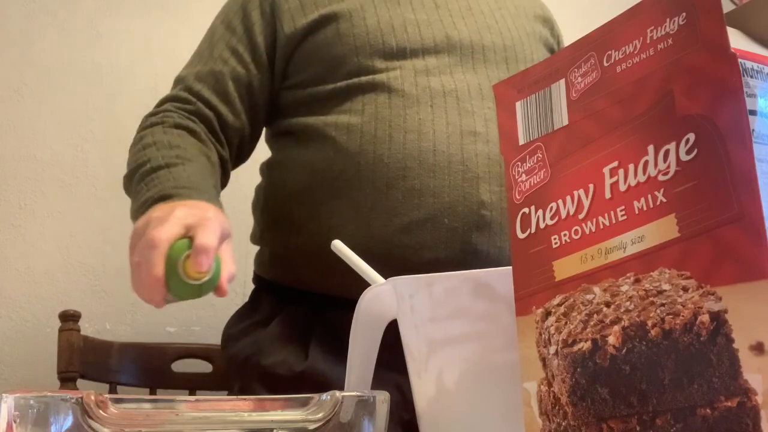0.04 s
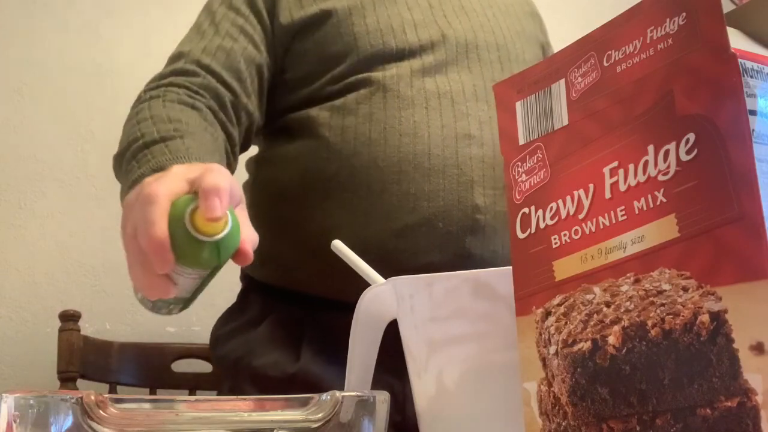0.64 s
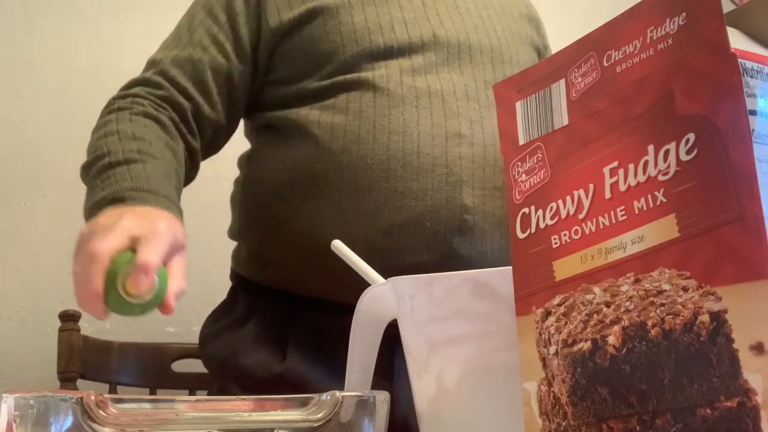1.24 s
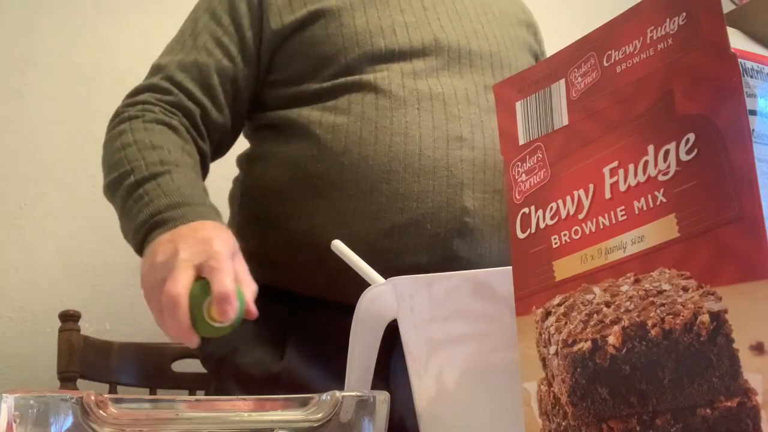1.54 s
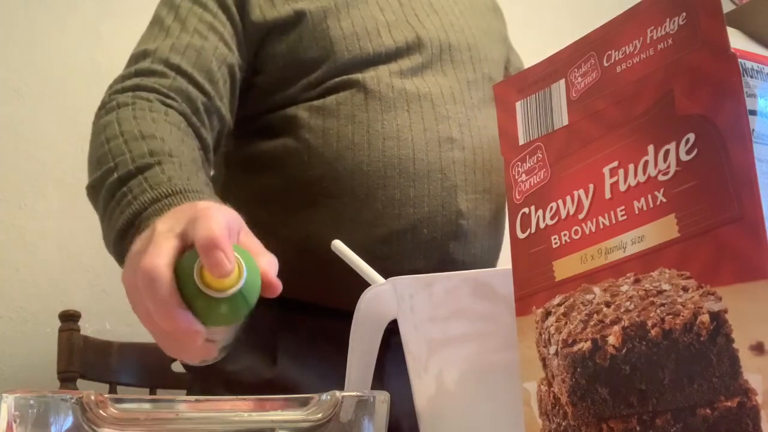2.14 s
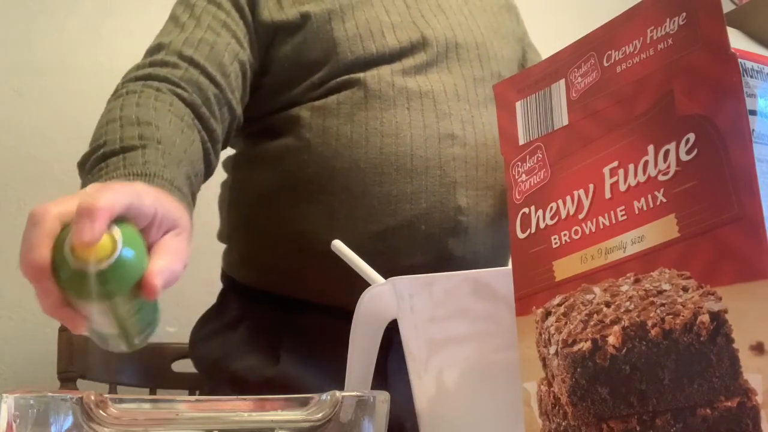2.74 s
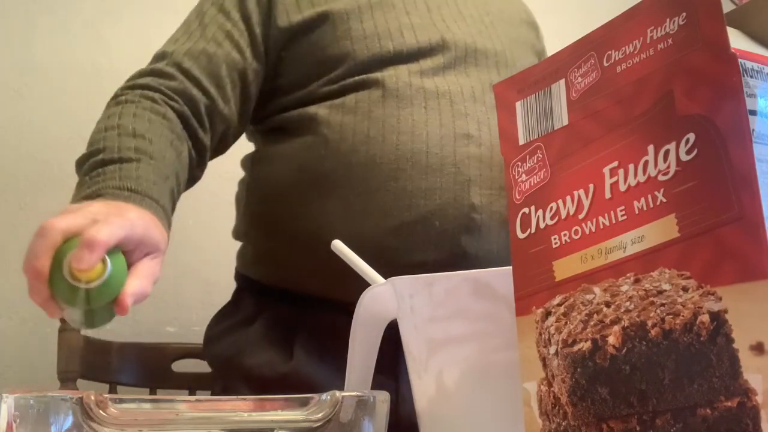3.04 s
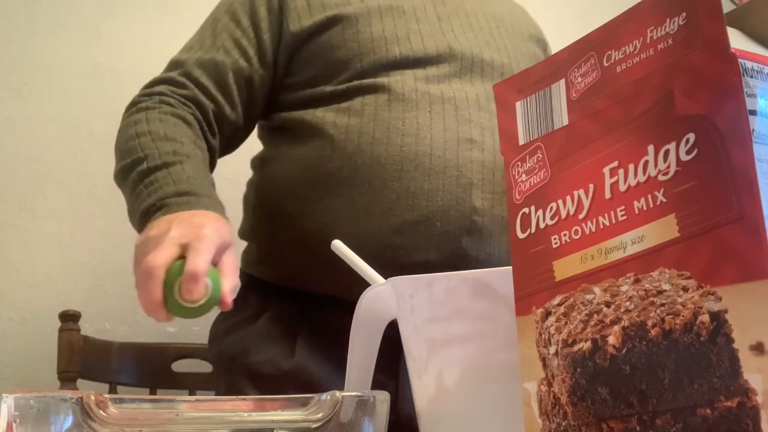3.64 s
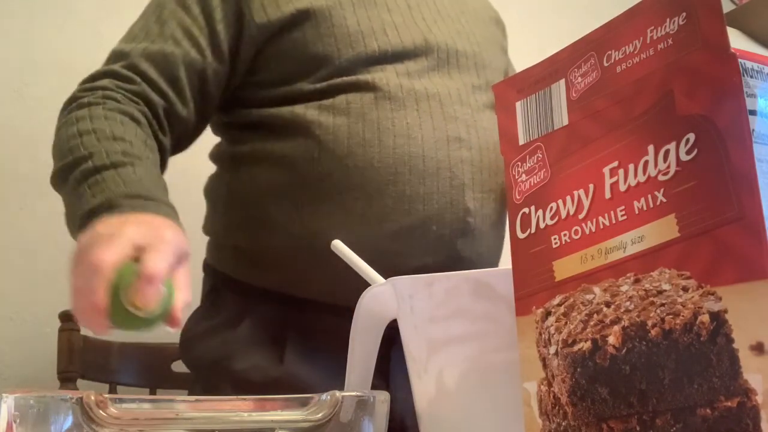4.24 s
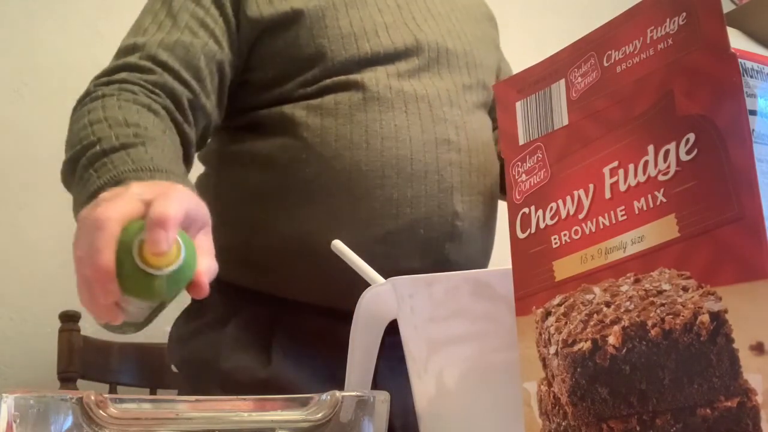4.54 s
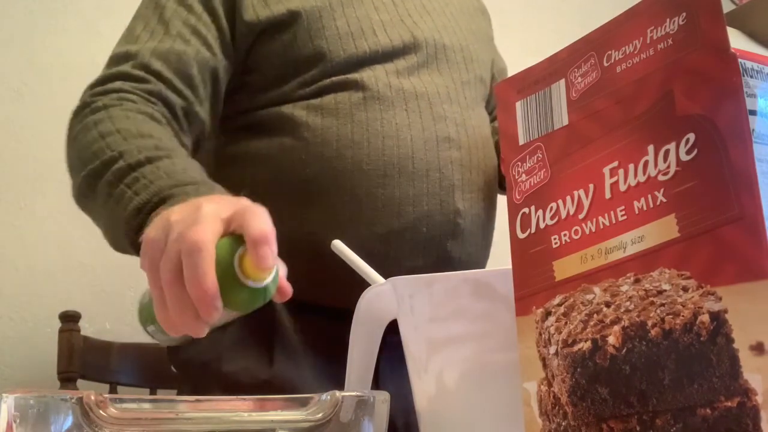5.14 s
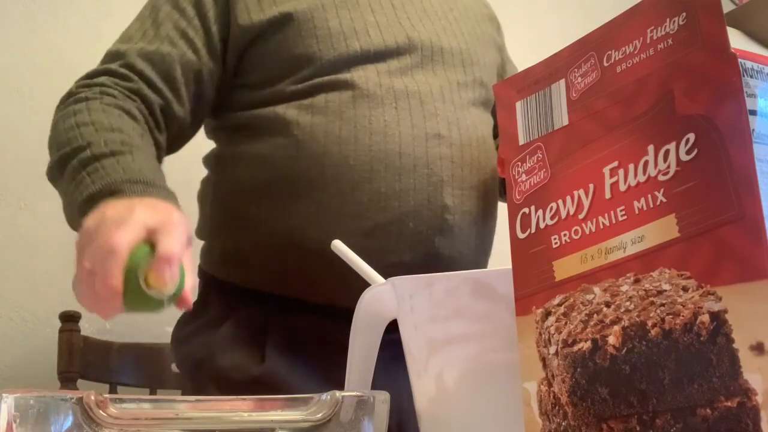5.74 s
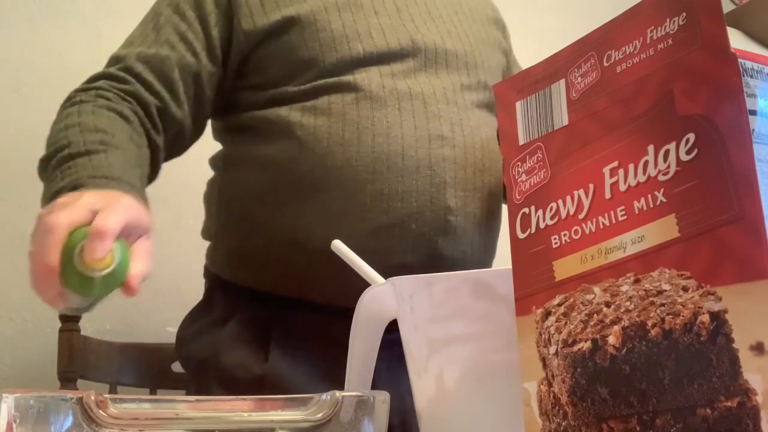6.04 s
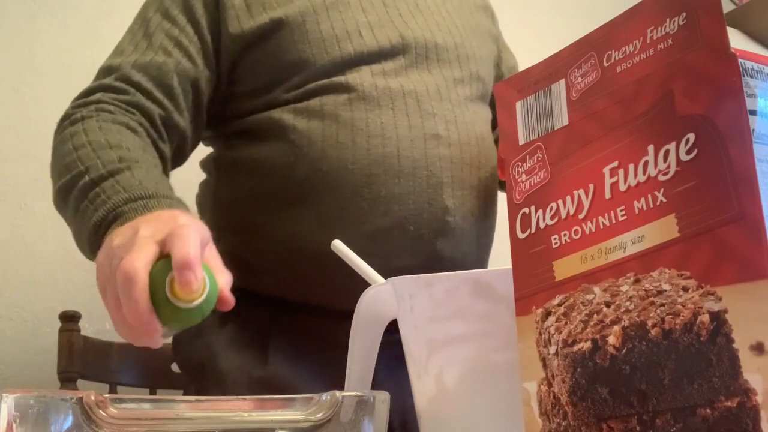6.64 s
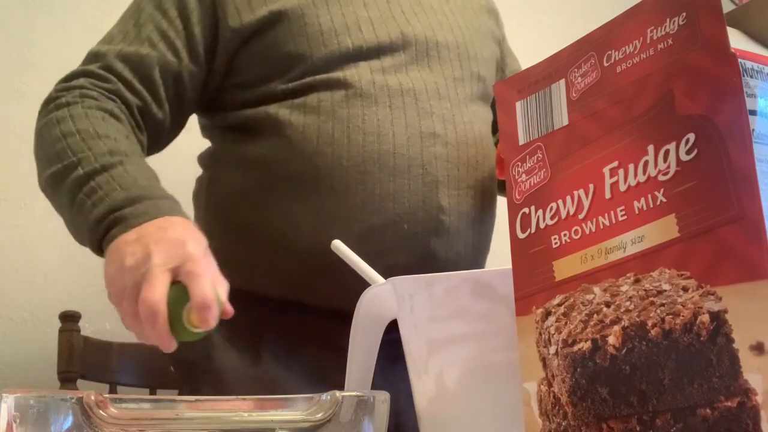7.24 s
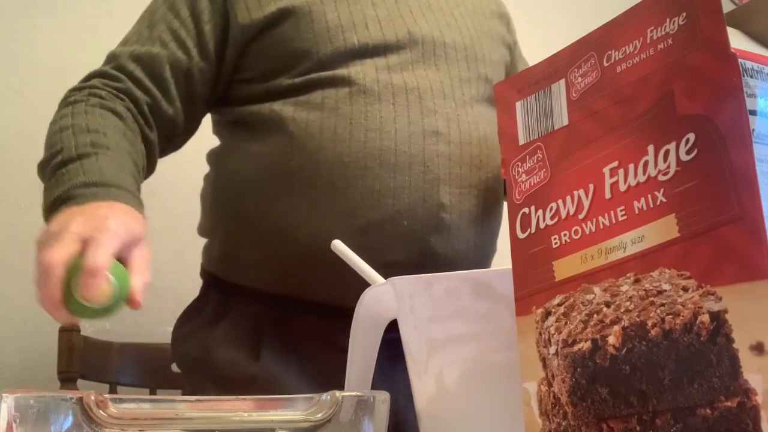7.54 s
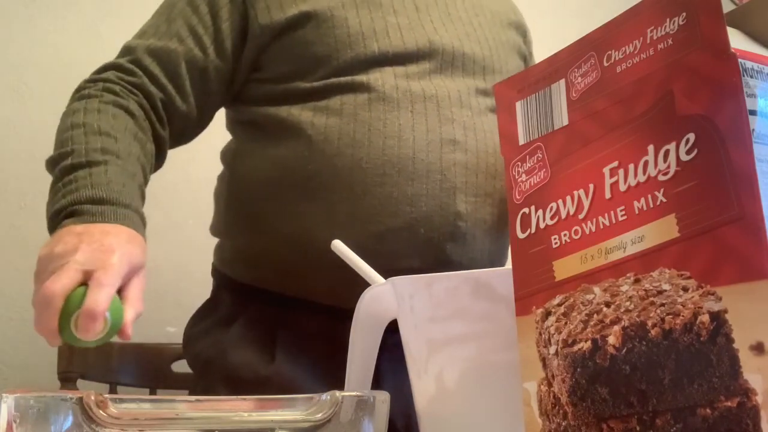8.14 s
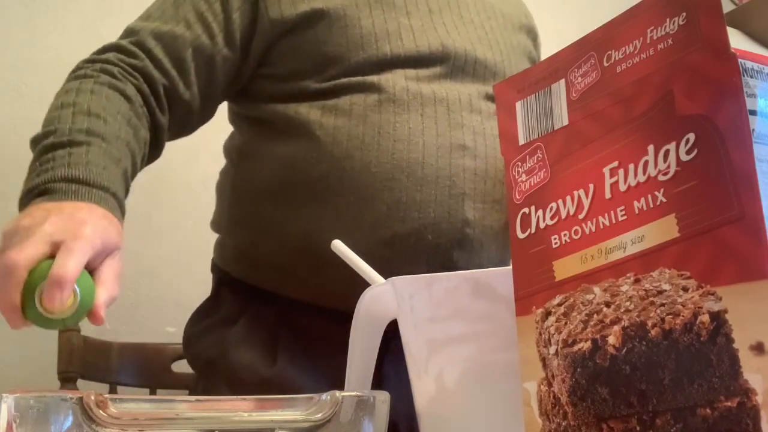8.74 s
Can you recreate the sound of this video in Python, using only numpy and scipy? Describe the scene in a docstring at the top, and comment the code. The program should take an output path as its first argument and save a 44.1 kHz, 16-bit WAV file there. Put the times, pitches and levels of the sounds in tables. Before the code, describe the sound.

An aerosol can of cooking spray hisses over a glass dish in three long presses, then three short spitting spurts, in a quiet kitchen.

```python
"""A can of cooking spray is swept over a glass baking dish on a table in a quiet kitchen.
First come a light knock and three long presses of about two seconds each: the oily jet sputters, the mist
drums on the glass, and the echo off the moving spray's target swirls the hiss, over a few soft bumps.
From 6.6 s three short spurts follow, each spitting as the valve opens; the second catches and restarts.
At last the plastic button springs back, and a sleeve that has brushed now and then rustles once more."""
import sys
import numpy as np
from scipy import signal
from scipy.fft import rfft, irfft
from scipy.io import wavfile

SR = 44100
rng = np.random.default_rng(int(sys.argv[2]) if len(sys.argv) > 2 else 0)


def store_pcm(level_fs):
    """Save levels as 16-bit WAV."""
    pcm = np.round(np.clip(level_fs, -1, 1) * 32767).astype(np.int16)
    wavfile.write(sys.argv[1], SR, np.atleast_2d(pcm).T)


N = 392490
TIME, HZ = np.arange(N) / SR, np.fft.rfftfreq(N, 1 / SR)


# The tone of the hiss, before each part gets its own loudness: f/Hz, relative level/dB
HISS_TONE = [(100, -16.5), (230, -24), (350, -19), (560, -20), (820, -16), (1150, -21), (1700, -17.5),
             (2600, -16), (4900, -10), (6500, -13), (8200, -8.5), (10500, -2.5), (12400, -0.5),
             (13700, -1.5), (15500, 3)]
# Its five parts (jet, mist, splash, drumming, rush of gas):
# low f/Hz, high f/Hz, added level/dB, sputter depth/dB, exponent (higher fades sooner with the flow)
HISS_PARTS = [(8920, 18600, 4.8, 1.55, 1.7), (5900, 8300, 2.5, 1.5, 1.6), (1570, 5550, -0.65, 1.05, 0.84),
              (702, 1486, 0.24, 0.5, 0.74), (166.3, 690, -3, 2.5, 0.48)]
def spray(sputter_hz=420, surge_hz=45, surge=0.31, extra_per_db=0.028, waver_hz=9, waver_db=0.48):
    """Churning gas hisses; oil and gas leave in clumps, so all parts of the hiss sputter together."""
    levels_db = spray_levels()
    jet_db = levels_db[0]
    force = np.clip(1 + extra_per_db * (jet_db - jet_db.mean()), .5, 2)  # a strong jet sputters more
    sputter = force * unit(flutter(sputter_hz) + surge * flutter(surge_hz))
    flow = valve() * amp(waver_db * flutter(waver_hz))  # the finger is never quite steady
    tone, out = amp(across(HISS_TONE)), np.zeros(N)
    for level_db, (low_hz, high_hz, trim_db, depth_db, power) in zip(levels_db, HISS_PARTS):
        hiss = mono_noise(band(low_hz, high_hz, steepness=10) * tone)
        out += hiss * amp(level_db + trim_db) * unit(amp(depth_db * sputter)) * flow ** power
    return out


# Long presses of the button: open t/s, shut t/s, fade t/s
LONG_PRESSES = [(0.002, 2.38, .042), (2.441, 4.412, .05), (4.4865, 6.487, .021)]
# Short spurts; the second restarts, so it takes two rows:
# open t/s, shut t/s, jet level/dB, splash level/dB, drumming level/dB, drop of the jet/(dB per s)
SHORT_SPURTS = [(6.587, 6.808, -39, -48.5, -61.5, -2), (6.9404, 6.987, -42, -48.5, -62.5, 32),
                (7.005, 7.355, -37.5, -46.5, -61.5, 16), (8.043, 8.292, -42.5, -51.5, -63.5, 11)]
def valve(opening_s=0.0025, spurt_fade_s=0.018):
    """The flow, from 0 to 1: it starts almost at once and dies away when the finger lifts."""
    pushes = list(LONG_PRESSES) + [(start, shut, spurt_fade_s) for start, shut, *_ in SHORT_SPURTS]
    flow = np.zeros(N)
    for start, shut, fade_s in pushes:
        opening = np.clip((TIME - start) / opening_s, 0, 1)
        closing = np.exp(-np.maximum(TIME - shut, 0) / fade_s)
        flow = np.maximum(flow, opening * closing)
    return flow


# Loudness as the can tilts and the aim wanders, one list for each long press:
# t/s, jet level/dB, splash level/dB, drumming level/dB
PRESS_LEVELS = [
    [(0.08, -42, -54.5, -77), (0.33, -42, -60, -76), (0.37, -41.5, -53.5, -69), (0.58, -36.5, -52.5, -69),
     (1.05, -38, -49.5, -70), (1.23, -44.5, -52.5, -68.5), (1.62, -46.5, -52.5, -71),
     (1.81, -45.5, -49, -65.5), (1.86, -41, -48, -67), (2.25, -38.5, -49, -64.5),
     (2.37, -36.5, -48.5, -63.5)],
    [(2.47, -31, -47, -58.5), (2.49, -29, -45.5, -58.5), (2.668, -30, -44.5, -58),
     (2.866, -33.5, -47, -58.5), (3.076, -37.5, -46.5, -58.5), (3.496, -42.5, -52.5, -63),
     (3.9, -44, -50, -67.5), (3.958, -38.5, -49.5, -64.5), (4.146, -42.5, -50.5, -70.5),
     (4.238, -47.5, -52, -63.5), (4.4, -46, -50, -66)],
    [(4.51, -36, -47, -60.5), (4.612, -34.5, -45.5, -60.5), (4.722, -32, -44.5, -57.5),
     (4.984, -32, -44.5, -58), (5.274, -37.5, -47, -61), (5.508, -38, -47, -59.5), (5.824, -36, -48, -59.5),
     (5.884, -41, -48.5, -60), (6.016, -37, -46.5, -60.5), (6.246, -43, -50.5, -61),
     (6.47, -38, -46.5, -61.5)],
]
def spray_levels(splash_share=.6, mist_swell=0.7, rush_swell=1.4):
    """The five parts' levels in dB follow the aim; in most spurts they sink as the pressure sags."""
    rows = [row for press in PRESS_LEVELS for row in press]
    for start, shut, jet, splash, drum, sag in SHORT_SPURTS:
        lost_db = sag * (shut - start)
        rows += [(start, jet, splash, drum), (shut, jet - lost_db, splash - splash_share * lost_db, drum)]
    times, *columns = np.transpose(rows)
    jet, splash, drum = [np.interp(TIME, times, column) for column in columns]
    mist = splash.mean() + mist_swell * (splash - splash.mean())
    rush = drum.mean() + rush_swell * (drum - drum.mean())
    return jet, mist, splash, drum, rush


# The biggest blobs of oil spat from the nozzle: t/s, level/dB, fade t/s
OIL_BLOBS = [(2.5045, -23, .0007), (2.5645, -22, .0007), (2.6708, -26, .0007), (4.4875, -24, .002),
             (6.068, -28, .002), (6.5923, -17, .002), (6.9448, -21, .0028), (7.0055, -38, .004),
             (8.0475, -28, .0016)]
# Their tone: f/Hz, relative level/dB
SPIT_TONE = [(500, -37), (2000, -33), (5000, -24), (9000, -8.5), (13000, -4.5), (15400, 2.5), (16000, 6.5),
             (16800, -31)]
def spits(rise_s=0.00037):
    """Each blob of oil bursts from the nozzle as a very short, bright puff."""
    puffs = sum(amp(db) * np.exp(-np.maximum((at - TIME) / rise_s, (TIME - at) / fade_s))
                for at, db, fade_s in OIL_BLOBS)
    return mono_noise(amp(across(SPIT_TONE))) * puffs


# How much farther the echo travels as the hand moves: t/s, extra distance/m
ECHO_PATH = [(0.26, 0.041), (0.53, 0.1), (0.92, 0.13), (1.42, 0.045), (1.94, 0.096), (2.47, 0.15),
             (2.91, 0.16), (3.1, 0.125), (3.3, 0.052), (3.73, 0.063), (4.06, 0.11), (4.33, 0.072),
             (4.49, 0.11), (4.76, 0.12), (5.34, 0.047), (5.56, 0.13), (5.94, 0.031), (6.06, 0.097),
             (6.41, 0.035), (6.76, 0.11), (7.12, 0.05), (8.34, 0.047)]
# How much sound the dish throws back: f/Hz, share
ECHO_STRENGTH = [(700, 0.21), (1500, 0.26), (3000, 0.58), (5000, 0.22), (8500, 0.23), (15000, 0.036)]
def dish(hiss, sound_m_per_s=343, rim_gain=0.64, rim_low_hz=1190, rim_high_hz=8500, width=1.1):
    """The echo off the dish lifts some pitches and cancels others; they slide as the hand sweeps."""
    hz, t, spectrum = signal.stft(hiss, SR, nperseg=1024)
    hz = hz[:, None]
    delay_s = np.interp(t, *np.transpose(ECHO_PATH)) / sound_m_per_s
    echo = across(ECHO_STRENGTH, hz) * np.exp(-2j * np.pi * hz * delay_s)
    # Long waves pass around the rims, and the highest pitches fade too.
    rims = rim_gain * hz / np.hypot(hz, rim_low_hz) / np.hypot(1, hz / rim_high_hz)
    swirl = 1 + echo + rims * rim_echoes(hz, t, delay_s)
    side = width * np.sqrt((1 - likeness(hz)) / 2) * rim_echoes(hz, t, delay_s)
    left_right = np.array([swirl + side, swirl - side]) / np.sqrt(np.mean(abs(swirl) ** 2))
    # The hollow dish focuses sound on the first lifted pitch: 1 dB more, with a dip on either side.
    off_peak = (np.log2((hz + 1) * delay_s) / 0.48) ** 2  # 0.48 octaves sets how wide
    focus = amp((1 - off_peak / 2) * np.exp(-off_peak / 2))
    return signal.istft(spectrum * focus * left_right, SR, nperseg=1024)[1][:, :N]


def rim_echoes(hz, t, dish_delay_s, count=22, facing_hz=1.0):
    """Weak echoes off rims and things on the table; each follows the hand in its own way."""
    out = 0
    for late, facing_start, pace, sway_start, turn, lean in rng.random((count, 6)):
        sway = 1 + .12 * np.sin(2 * np.pi * ((.5 + .9 * pace) * t + sway_start))
        delay_s = (.0004 + .004 * late ** 2) * sway + (2.4 * lean - .4) * dish_delay_s
        # A surface echoes only while the spray faces it.
        facing = np.sin(2 * np.pi * (facing_hz * (turn + .5) * t + facing_start))
        out = out + facing * np.exp(-2j * np.pi * hz * delay_s)
    return out * np.sqrt(2 / count)


# Light knocks: t/s, level/dB
KNOCK_HITS = [(.007, -26), (2.272, -48.5)]
# The notes in a knock: f/Hz, relative level/dB, ring t/s
KNOCK_NOTES = [(180, -13, 0.033), (480, -2, 0.019), (680, 2, 0.011), (900, 6.5, 0.023)]
def knocks():
    """Hard things tap the table and ring briefly."""
    return strikes(KNOCK_HITS, KNOCK_NOTES, contact_s=0.0019)


# Dull bumps: t/s, level/dB
BUMP_HITS = [(1.352, -37), (1.365, -41), (1.395, -43), (1.462, -46), (4.262, -48), (4.292, -50.5)]
# The notes in a bump: f/Hz, relative level/dB, ring t/s
BUMP_NOTES = [(68, -14, 0.18), (135, -4, .13), (156, -12, 0.14), (224, -3.5, 0.078), (430, 3, 0.031)]
def bumps():
    """Slower, softer blows thud through the table and floor."""
    return strikes(BUMP_HITS, BUMP_NOTES, contact_s=0.0073)


# Clicks around the last spurt: t/s, level/dB
CLICK_HITS = [(8.0335, -62), (8.337, -50.5)]
# The notes in a click: f/Hz, relative level/dB, ring t/s
CLICK_NOTES = [(750, 4, 0.011), (1080, -4, 0.011), (1280, 4, 0.027)]
def button():
    """The plastic button clicks going down and again as it springs back."""
    return strikes(CLICK_HITS, CLICK_NOTES, contact_s=.0005)


def strikes(hits, notes, contact_s):
    """Each hit swells while the things touch; its notes then fall by 60 dB over their ring time."""
    out, t = np.zeros(N), np.arange(SR // 2) / SR
    swell = 1 - np.exp(-(t / contact_s) ** 2)
    for at, db in hits:
        ring = 0
        for hz, note_db, ring_s in notes:
            fade = np.exp(-np.log(1000) * t / ring_s)
            ring += amp(db + note_db) * fade * np.sin(2 * np.pi * (hz * t + rng.random()))
        part = out[round(at * SR):][:len(t)]
        part += (ring * swell)[:len(part)]
    return out


def gas_rumble(low_hz=47, high_hz=154, below_rush_db=12):
    """Gas spilling over the rim of the dish puffs softly against the microphone."""
    rush_db = spray_levels()[-1]
    return stereo_noise(band(low_hz, high_hz, steepness=6)) * amp(rush_db - below_rush_db) * valve()


# Strokes of the sleeve: start t/s, length t/s, level/dB
SLEEVE_STROKES = [(0.927, .9, -62), (2.053, 0.3, -71), (4.25, 0.67, -80), (7.301, 0.41, -66),
                  (7.92, 0.53, -70), (8.351, 0.188, -66), (8.553, .15, -77)]
# The tone of the cloth: f/Hz, relative level/dB
CLOTH_TONE = [(60, 3), (140, 5.5), (260, 0), (360, 7), (520, -8.5), (950, -8.5), (1500, -20.5),
              (3000, -28.5), (12000, -40.5)]
def sleeve(rub_hz=25, rub_db=1.5, resting_db=-81):
    """Knitted cloth rubs in soft, uneven strokes that swell and fade."""
    strokes = sum(amp(db) * np.sin(np.pi * np.clip((TIME - start) / length, 0, 1))
                  for start, length, db in SLEEVE_STROKES)
    cloth = stereo_noise(amp(across(CLOTH_TONE)))
    return cloth * (amp(resting_db) + strokes) * unit(amp(rub_db * flutter(rub_hz)))


# How long the kitchen takes to fade by 60 dB: f/Hz, t/s
ROOM_FADE = [(200, 0.43), (1000, 0.27), (4000, 0.3), (9000, 0.38), (15000, .22)]
def kitchen_echo(sound, first_echo_s=0.0024):
    """The walls of a small room send back a blur of echoes; the highest pitches die first."""
    hz, t, spectra = signal.stft(rng.standard_normal((2, SR // 2)), SR, nperseg=256)
    fade = np.exp(-np.log(1000) * t / across(ROOM_FADE, hz)[:, None])
    tail = signal.istft(left_and_right(*spectra, hz[:, None]) * fade, SR, nperseg=256)[1]
    tail *= np.arange(tail.shape[1]) / SR > first_echo_s
    return signal.fftconvolve(sound, tail / np.linalg.norm(tail[0]), axes=1)[:, :N]


# The tone of the quiet kitchen: f/Hz, relative level/dB
HUSH_TONE = [(20, -18.5), (32, -17), (50, 7), (65, -1), (90, -2), (125, 0), (175, -16), (290, -19),
             (355, -11.5), (430, -22.5), (600, -19.5), (1000, -24.5), (2200, -32), (6000, -35.5),
             (15500, -32.5)]
def kitchen_hush(level_db=-69.5):
    """A faint, steady rumble and hiss lie under everything."""
    return amp(level_db) * stereo_noise(amp(across(HUSH_TONE)))


# How alike the microphone's two sides sound: f/Hz, likeness (1 is the same)
SIDES_ALIKE = [(100, 0.88), (900, 0.89), (2000, 0.59), (3000, 0.59), (4300, 1), (6000, 0.11), (7500, 0.92),
               (9300, 1), (11400, 0.61), (15500, 1)]
def likeness(hz):
    """How much left and right share at each pitch."""
    return np.clip(across(SIDES_ALIKE, hz), 0, 1)


def left_and_right(a, b, hz):
    """Blends two unrelated noises into a partly alike left and right."""
    same = likeness(hz)
    mid, side = a * np.sqrt((1 + same) / 2), b * np.sqrt((1 - same) / 2)
    return np.array([mid + side, mid - side])


def stereo_noise(tone):
    """Left and right noise with the given tone."""
    return unit(irfft(left_and_right(*rfft(rng.standard_normal((2, N))), HZ) * tone, N))


def mono_noise(tone):
    """Noise from a single point, with the given tone."""
    return unit(irfft(rfft(rng.standard_normal(N)) * tone, N))


def flutter(rate_hz):
    """A random wobble, mostly slower than the given rate."""
    return mono_noise(1 / (1 + (HZ / rate_hz) ** 2))


def band(low_hz, high_hz, steepness):
    """A tone that keeps the pitches between two soft edges."""
    return 1 / np.sqrt((1 + (low_hz / (HZ + 1)) ** steepness) * (1 + (HZ / high_hz) ** steepness))


def across(points, hz=HZ):
    """Reads between a table's rows, giving every octave equal room."""
    f, value = np.transpose(points)
    return np.interp(np.log(hz + 1), np.log(f), value)


def amp(db):
    """Turns decibels into a multiplier."""
    return 10 ** (np.asarray(db) / 20)


def unit(x):
    """Scales a signal to an average strength (rms) of one."""
    return x / np.sqrt(np.mean(x ** 2) + 1e-20)


def scene(spray_room_db=-11, knock_room_db=-12):
    """The spray, the knocks and the sleeve in the quiet kitchen."""
    hiss = dish(spray() + spits())
    taps = knocks() + bumps() + button()
    room = kitchen_echo(amp(spray_room_db) * hiss + amp(knock_room_db) * taps)
    return hiss + taps + room + gas_rumble() + sleeve() + kitchen_hush()


# How far the left wave runs ahead of the right: f/Hz, angle/rad
LEFT_LEAD = [(100, 0.08), (1800, -0.05), (2900, 0.22), (4300, 1), (5200, -1.44), (6000, -2.7), (6600, -1.4),
             (7400, -0.2)]
def record(dry, top_hz=15850, treble_hz=7560, treble_lead_s=.000264):
    """The microphone pair puts high pitches out of step between the sides and cuts the very highest."""
    lead = across(LEFT_LEAD) + 2 * np.pi * np.maximum(HZ - treble_hz, 0) * treble_lead_s
    wide = irfft(rfft(dry) * np.exp(.5j * np.array([lead, -lead])), N)
    top_cut = signal.firwin(601, top_hz, window=("kaiser", 8), fs=SR)
    return signal.oaconvolve(wide, top_cut[None], "same")


dry = scene()
out = record(dry)
store_pcm(out)
```